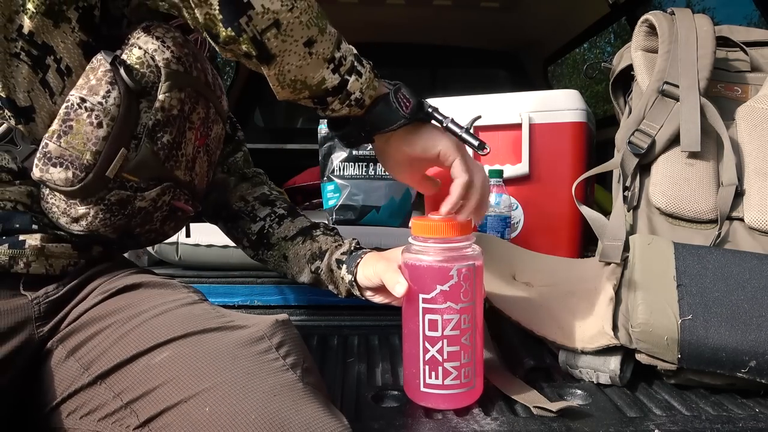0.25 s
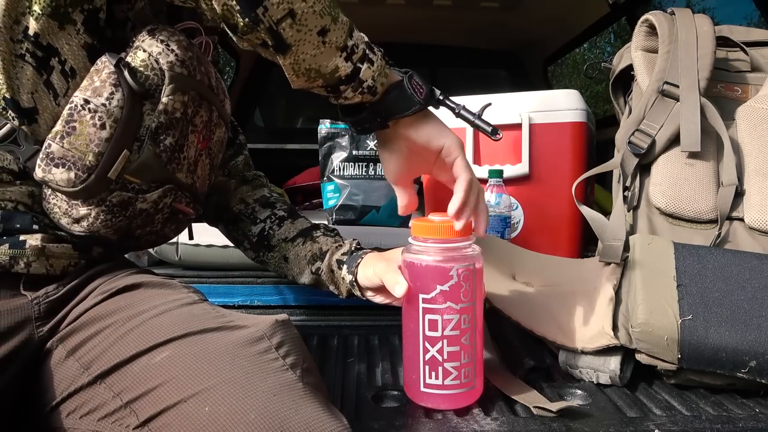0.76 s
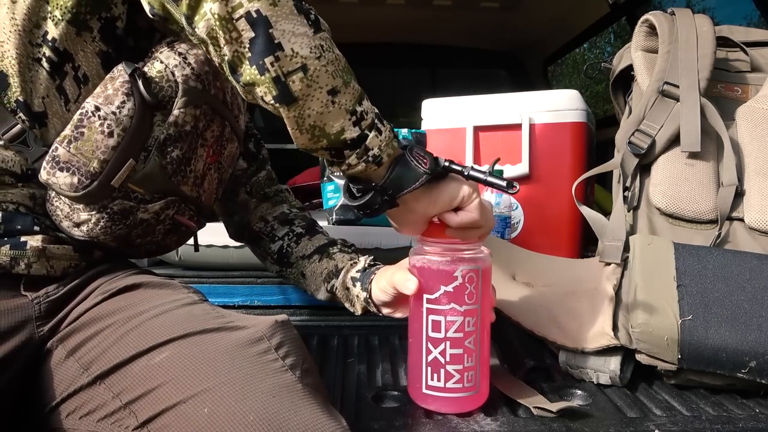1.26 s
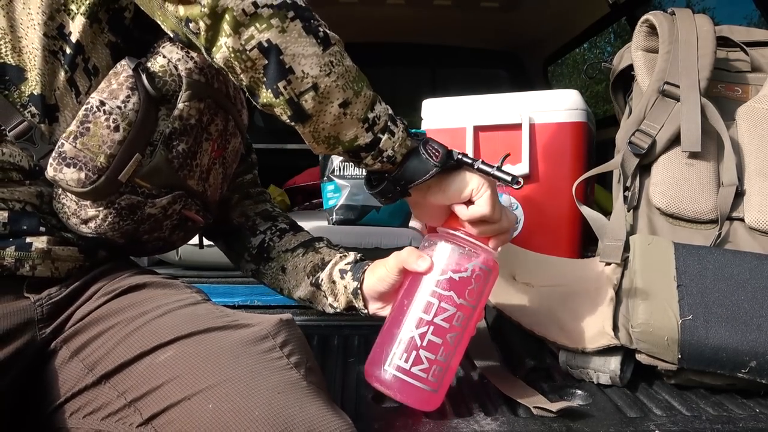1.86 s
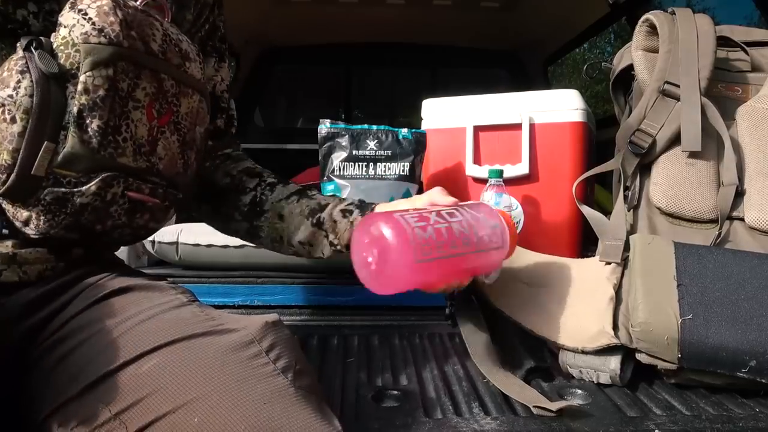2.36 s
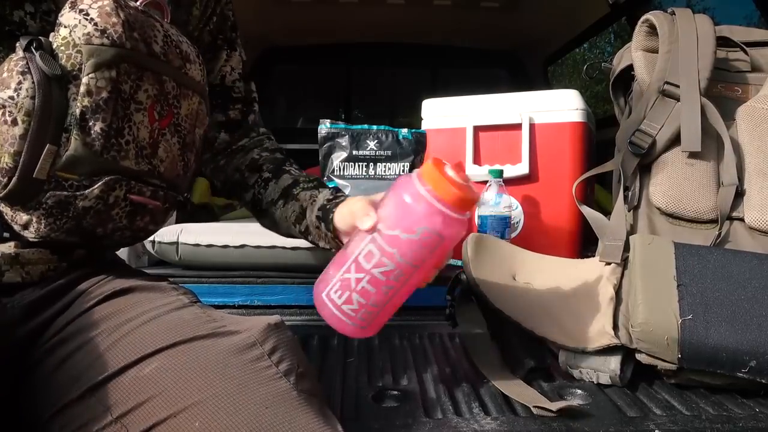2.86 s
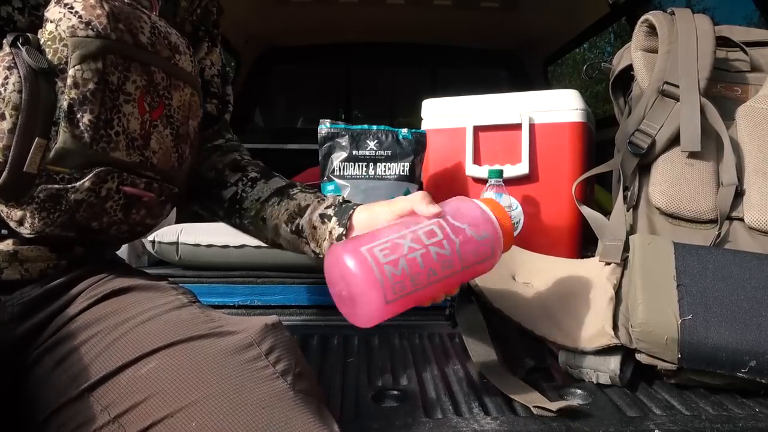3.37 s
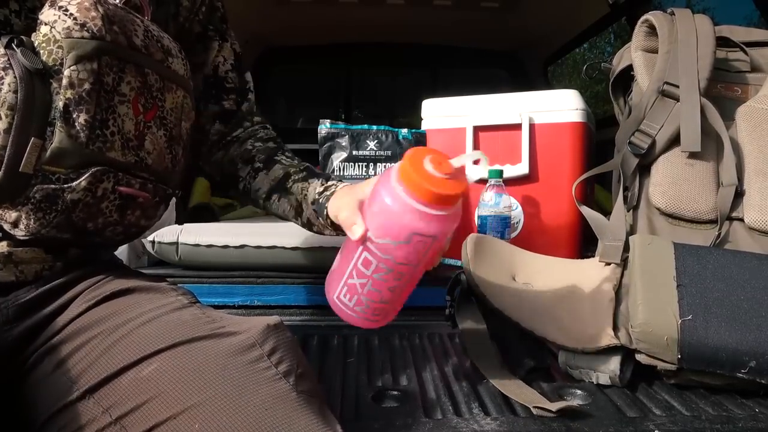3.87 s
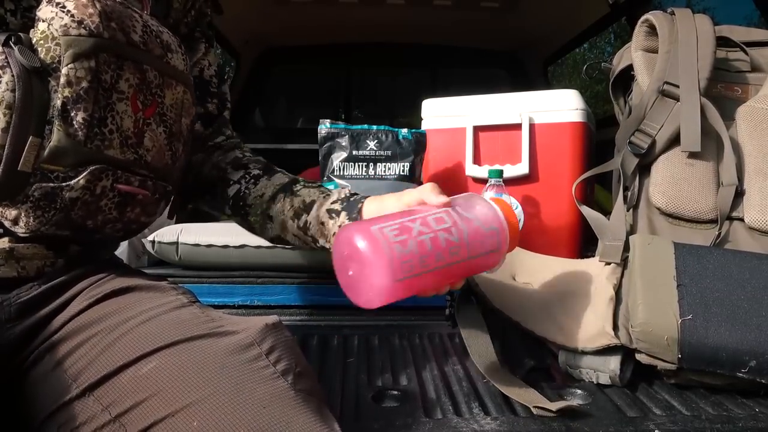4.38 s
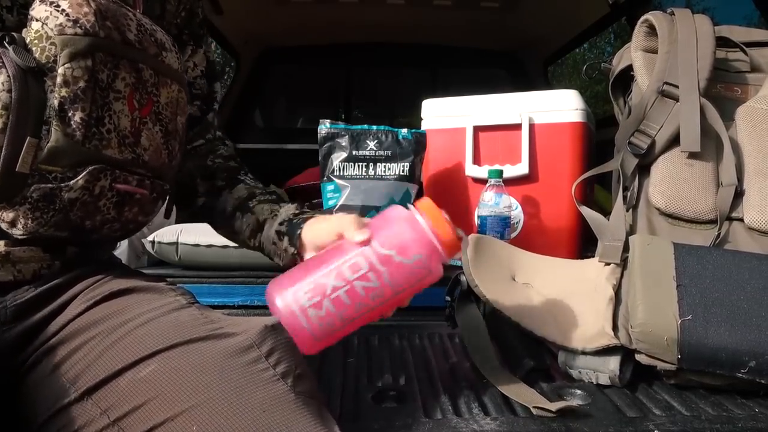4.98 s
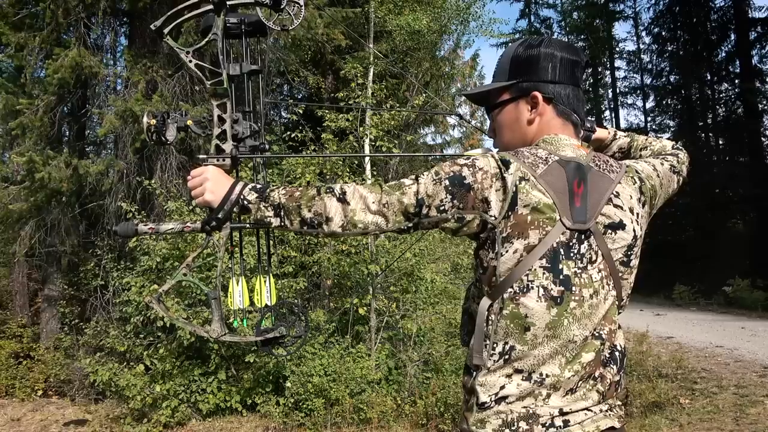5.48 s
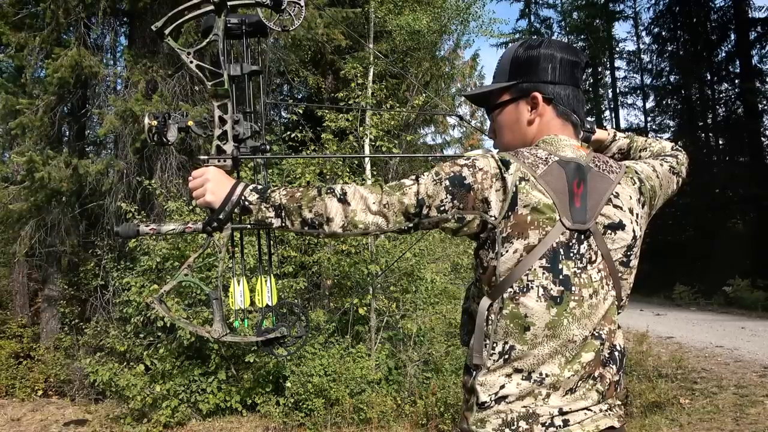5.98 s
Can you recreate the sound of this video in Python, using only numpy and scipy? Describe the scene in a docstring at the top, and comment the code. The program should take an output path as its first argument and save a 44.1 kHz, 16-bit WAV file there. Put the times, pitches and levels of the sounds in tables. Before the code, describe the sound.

Near microphone, short dull echo from the truck bed. Grainy strokes of palm and cap thread mix with crisp plastic knocks, the sharpest early on. The bottle then strikes the metal bed, by far the loudest moment, with a low boom. After a tiny pause come about three seconds of brisk, bubbly sloshing, about five splashes each second, getting softer until only the hush of woodland air remains, with a few barely audible ticks.

```python
"""Outdoors on a pickup tailgate a hand rubs and taps the cap of a wide plastic bottle: grainy noise and short rings.
The bottle bumps the truck bed, which rings as sheet metal; near the hardest bumps the truck body booms.
From about 2 s shaking makes the drink slosh: swarms of tiny rising tones through a ringing wall, plus low gulps.
By about 5.5 s it has faded into quiet woods, a filtered hush with low breeze that runs throughout.
Just after 6 s a bird whistles faintly, a wavering tone."""
import sys
import numpy as np
from scipy import signal
from scipy.fft import rfft, irfft
from scipy.io import wavfile
from scipy.ndimage import uniform_filter1d

SR = 44100
rng = np.random.default_rng(int(sys.argv[2]) if len(sys.argv) > 2 else 0)


def digitize_waveform(pressure):
    """Quantize a signal to 16-bit integers and store it at the path in sys.argv[1].

    Rows of a 2-D input are taken as channels; values are limited to [-1, 1].
    """
    field = np.atleast_2d(pressure).T
    bounded = np.clip(field, -1, 1)
    quanta = np.round(bounded * 32767).astype(np.int16)
    wavfile.write(sys.argv[1], SR, quanta)


N = 274729

# the drink slamming into an end of the bottle: t/s, level/dB, time to fall by 60 dB/s
SURGES = [(1.964, -36.5, 0.15), (2.017, -39, 0.1), (2.059, -30, 0.22), (2.09, -21.5, 0.031),
          (2.108, -16, 0.038), (2.211, -23, 0.031), (2.223, -18, .11), (2.264, -21.5, 0.099),
          (2.332, -15, 0.16), (2.4, -29, 0.2), (2.456, -21.5, .11), (2.548, -29, 0.15),
          (2.575, -9.5, 0.025), (2.662, -17.5, 0.057), (2.767, -22.5, .08), (2.785, -17.5, .062),
          (2.856, -16, 0.17), (2.974, -26, .17), (3.071, -19, 0.088), (3.183, -22.5, .11),
          (3.282, -20.5, 0.21), (3.394, -22.5, 0.2), (3.46, -25, 0.33), (3.552, -24, 0.045),
          (3.6, -21.5, 0.059), (3.672, -20, .11), (3.747, -26.5, 0.19), (3.795, -25, .13),
          (3.895, -19.5, .11), (3.972, -22, 0.063), (4.072, -18.5, 0.018), (4.173, -19, 0.018),
          (4.233, -30, 0.036), (4.267, -22.5, 0.049), (4.347, -21.5, 0.12), (4.392, -25, 0.095),
          (4.479, -20, 0.1), (4.595, -22, 0.17), (4.698, -22.5, 0.075), (4.754, -26, 0.11),
          (4.82, -26, 0.29), (4.986, -27.5, 0.18), (4.91, -29.5, 0.14), (5.101, -32, 0.11),
          (5.148, -34.5, 0.07), (5.207, -32, 0.038), (5.251, -34.5, 0.095)]


def gain_of(db):
    """Turns decibels into a gain."""
    return 10 ** (np.asarray(db) / 20)


def evened(x):
    """Scales a signal to rms 1."""
    return x / np.sqrt(np.mean(x ** 2) + 1e-20)


def smoothed_noise(size, width):
    """Makes slowly wandering random values by averaging noise over width values; rms 1."""
    return evened(uniform_filter1d(rng.standard_normal(size), width))


def twice_smoothed_noise(size, width):
    """Averages noise twice over, so that it wanders more smoothly; rms 1."""
    once = uniform_filter1d(rng.standard_normal(size), width)
    return evened(uniform_filter1d(once, width))


def read(points, hz):
    """Reads a spectrum between its points, on a log-frequency axis."""
    f, value = np.transpose(points)
    return np.interp(np.log(hz + 1), np.log(f + 1), value)


def add(mix, s, sound):
    """Mixes a sound in at s seconds."""
    part = mix[round(s * SR):][:len(sound)]
    part += sound[:len(part)]


def hiss(points, size, tilt_db=0.):
    """Noise of rms 1 with the given spectrum, tilted by tilt_db per octave above 300 Hz."""
    hz = np.fft.rfftfreq(size, 1 / SR)
    tilt = tilt_db * np.log2(np.maximum(hz, 300) / 300)
    spectrum = rfft(rng.standard_normal(size)) * gain_of(read(points, hz) + tilt)
    return evened(irfft(spectrum, size))


def ring(modes, tilt_db, stretch, seconds, spread_db, detune):
    """One blow: every mode, a close cluster of three, starts at once and dies away; peak 1."""
    t = np.arange(round(seconds * SR))[:, None] / SR
    hz, db, t60 = np.repeat(modes, 3, axis=0).T
    luck, shift = rng.standard_normal((2, len(hz)))
    start_db = db + tilt_db * np.log2(np.maximum(hz, 150) / 400) + spread_db * luck
    decay = gain_of(start_db - 60 * t / (t60 * max(stretch, .1)))
    tones = np.sin(2 * np.pi * hz * (1 + detune * shift) * t)
    x = (decay * tones).sum(1)
    return x / abs(x).max()


def air():
    """Low lumpy breeze over the steady hush of the woods, both from one shaped noise."""
    # colour of the outdoor air: f/Hz, level/dB per Hz before the overall level is set
    air_colour = [(15, -40.5), (25, -12), (38, -3.5), (58, -7), (72, -10), (87, -20.5), (167, -26.5),
                  (213, -18.5), (238, -24), (4210, -43.5), (14700, -48.5), (16400, -49.5)]
    swell = evened(gain_of(2.2 * twice_smoothed_noise(N, 4000)))
    hush = hiss(air_colour, N)
    breeze = signal.sosfiltfilt(signal.butter(2, 120, fs=SR, output="sos"), hush)
    # only the part below about 120 Hz swells
    return gain_of(-57) * (hush + breeze * (swell - 1))


def bird():
    """A thin, faint falling whistle: one tone made slightly fuzzy by a quick random waver in pitch."""
    # path of the whistle: t/s, f/Hz, level/dB
    whistle = [(6.02, 7296, -79), (6.104, 6900, -83.5), (6.23, 6800, -79.5)]
    s, hz, db = np.transpose(whistle)
    t = np.arange(s[0], s[-1], 1 / SR)
    waver_hz = 88.0 * smoothed_noise(len(t), 120)
    tone = np.sin(2 * np.pi * np.cumsum(np.interp(t, s, hz) + waver_hz) / SR)
    fade_in = np.minimum((t - s[0]) / 0.047, 1)
    return s[0], np.sqrt(2) * gain_of(np.interp(t, s, db)) * tone * fade_in


def boom():
    """The whole truck body shudders irregularly: low band-passed noise that dies away."""
    # the shudder: level/dB, time to fall by 60 dB/s, lowest f/Hz, highest f/Hz
    shudder_settings = (-25.5, 0.96, 39.5, 121)
    db, t60, low_hz, high_hz = shudder_settings
    t = np.arange(SR // 2) / SR
    band = signal.butter(2, (low_hz, high_hz), "band", fs=SR, output="sos")
    shudder = signal.sosfilt(band, rng.standard_normal(SR))[SR // 2:]  # skip the filter's start
    return evened(shudder) * gain_of(db - 60 * t / t60) * np.minimum(t / 0.044, 1)


def bed():
    """The sheet-metal bed rings under each bump; the truck body booms near the hardest ones."""
    # the bottle bumping the bed: t/s, level/dB, tilt/dB per octave, ring time as a factor
    bumps = [(0.131, -33.5, 3, 0.6), (0.206, -20.5, 4, 0.47), (0.289, -34, -4, 0.39), (0.327, -33, 7, 0.4),
             (0.444, -32, 6.5, 0.95), (0.679, -37, -1, 0.98), (0.707, -19.5, 6.5, 0.93),
             (1.248, -21.5, 2.5, 0.88), (1.463, -13, 0.5, 0.26), (1.471, -10, -4.5, 0.65),
             (1.497, -15.5, 10, 0.22), (1.589, -1, 1.5, 0.99), (1.608, 1, 2.8, 0.68),
             (1.629, -25, -13.5, 0.42), (1.651, -6.5, 3.5, 0.42)]
    # ways the metal rings: f/Hz, level/dB, time to fall by 60 dB/s, each before a bump alters it
    bed_modes = [(111.9, -10, .5), (162, -0.5, 0.37), (210.4, -14, .22), (248.4, 6, 0.25), (296.4, 3, 0.11),
                 (363.3, -12.5, 0.086), (420, -7, 0.34), (489, -6, 0.1), (633, -16.5, 0.2),
                 (785, -4.5, 0.14), (990, -11.5, 0.21)]
    bump_rise_s, stop_s = .0012, 1.945
    out = np.zeros(N)
    for s, db, tilt_db, stretch in bumps:
        blow = ring(bed_modes, tilt_db, stretch, .6, spread_db=3., detune=.035)
        onset = np.minimum(np.arange(len(blow)) / (bump_rise_s * SR), 1)
        add(out, s, gain_of(db) * blow * onset)
    add(out, 1.59, boom())
    # the ringing stops abruptly, within 4 ms
    return out * np.clip((stop_s - np.arange(N) / SR) / .004, 0, 1)


def taps():
    """Cap and fingers tap the bottle: a crack, the short ring of the cap and a brief rattle."""
    # taps: t/s, level/dB, tilt/dB per octave, ring time as a factor
    tap_list = [(0.106, -28.5, -1, 0.64), (0.129, -22, -4.5, 0.68), (0.133, -21, 1, 0.35),
                (0.2, -18.5, -1.5, 0.36), (0.287, -23, -6, 0.24), (0.441, -3.5, 0, 0.28),
                (0.487, -26.5, -6.5, 0.35), (0.678, -17, -2, 0.48), (1.245, -32, -8, 0.44),
                (1.255, -28.5, -5.5, 0.39), (1.283, -38.5, -1, 0.35), (1.589, -10, -1, 0.18),
                (1.627, -16, -5.5, 0.7), (1.704, -51, 2, 0.5), (1.753, -40, -3.5, 0.27),
                (1.787, -44, -2.5, 0.18), (1.843, -52.5, -2, 0.3), (1.882, -43, 2.5, 0.61),
                (5.608, -52.5, 0, 0.33), (5.619, -44.5, -4.5, 0.25), (5.749, -57, -4.5, 0.45),
                (6.205, -50, 1, 0.33)]
    # ways the cap rings: f/Hz, level/dB, time to fall by 60 dB/s, each before a tap alters it
    cap_modes = [(630, -10.5, 0.14), (800, -13.5, 0.31), (1257, -24, 0.09), (1547, -4, 0.26),
                 (2075, -4.5, 0.12), (2260, -1.5, 0.019), (2990, -6.5, 0.14), (4221, -2.5, 0.017),
                 (4940, -4, 0.072), (6330, -29, 0.023), (7300, -18.5, .02)]
    # loose cap buzzing after a tap, also the crack's colour: f/Hz, level/dB per Hz before tilt and scaling
    rattle_colour = [(120, -30.5), (280, -9), (700, -8.5), (1200, -3), (1600, -11), (2200, -10.5),
                     (5200, -25), (7800, -19), (10500, -33), (16000, -54)]
    # duller taps come from softer fingers and start more gently
    rise_s, softer_per_db = .00004, .5
    out, t = np.zeros(N), np.arange(4096) / SR
    for s, db, tilt_db, stretch in tap_list:
        crack = hiss(rattle_colour, len(t), tilt_db - 1.5) * gain_of(-3.5 - 60 * t / 0.014)
        rattle_t60 = max(0.12 * stretch, .01)
        rattle = hiss(rattle_colour, len(t), tilt_db) * gain_of(-7.5 - 60 * t / rattle_t60)
        cap = gain_of(2.0) * ring(cap_modes, tilt_db, stretch, len(t) / SR, spread_db=0.5, detune=0.028)
        onset = np.minimum(t / (rise_s * np.exp(-softer_per_db * tilt_db)), 1)
        add(out, s, gain_of(db) * onset * (cap + crack + rattle))
    return out


def rub(rise, hold, fall, db, tilt_db):
    """Grainy stick-slip friction noise that swells, holds and dies away."""
    # colour of the rubbing: f/Hz, level/dB per Hz before tilt and scaling
    rub_colour = [(100, -17), (166, 4.5), (300, 1.5), (760, -9), (2000, -13), (3600, -21), (5300, -22),
                  (6500, -26.5), (8200, -19.5), (10000, -35), (16000, -36.5)]
    ends_db = -26.5  # where the rise begins and the fall ends, compared with the hold
    t = np.arange(0, rise + hold + fall, 1 / SR)
    away_from_hold = np.maximum(np.maximum(1 - t / rise, (t - rise - hold) / fall), 0)
    level_db = db + ends_db * away_from_hold
    slips = evened(gain_of(2.8 * smoothed_noise(len(t), 150)))
    noise = hiss(rub_colour, len(t), tilt_db)
    # the stroke's level is that of its treble
    treble = signal.sosfilt(signal.butter(4, 3500, "high", fs=SR, output="sos"), noise)
    fade_out = np.clip(4 * (rise + hold + fall - t) / fall, 0, 1)
    return gain_of(level_db) * noise / treble.std() * slips * fade_out


def rubs():
    """Palm and cap thread rub in separate strokes, each a swell of friction noise."""
    # strokes: start t/s, rise/s, hold/s, fall/s, treble level/dB, tilt/dB per octave
    strokes = [(0.017, 0.037, 0.045, .06, -53.5, 2.4), (.09, 0.051, 0.059, 0.044, -44.5, 2.7),
               (0.24, 0.022, .002, .025, -55, 0), (0.302, 0.02, 0.011, 0.028, -51, -1),
               (0.149, 0.07, 0.18, 0.065, -67.5, -0.5), (0.446, 0.005, 0.0022, 0.099, -37.5, 0.5),
               (0.497, 0.048, 0.027, 0.17, -70.5, -1.5), (0.675, 0.0042, 0.023, 0.13, -44.5, 0.15),
               (.8, 0.31, 0.025, 0.13, -57, 1), (1.102, 0.14, .19, 0.11, -60, 1.5),
               (1.431, 0.031, 0.056, 0.061, -49, -1.5), (1.521, 0.064, 0.066, .08, -54, -3.5)]
    out = np.zeros(N)
    for start, *stroke in strokes:
        add(out, start, rub(*stroke))
    return out


def bubble(db, hz, t60, slide, attack):
    """An air pocket rings as a damped, wobbling tone that slides a little in pitch."""
    t = np.arange(6000) / SR
    wobble = 0.044 * smoothed_noise(len(t), 300)
    drift = slide * (rng.standard_normal() + .5) * t  # more often up than down
    turns = np.cumsum(hz * (1 + drift + wobble)) / SR
    envelope = gain_of(db - 60 * t / max(t60, .01)) * np.minimum(t / attack, 1)
    return envelope * np.sin(2 * np.pi * turns)


def gulps():
    """Large trapped air pockets gulp low; every surge also throws off one small bright bubble."""
    # pockets gulping: t/s, level/dB, basic f/Hz
    pockets = [(2.113, -24, 245.7), (2.221, -28.5, 272), (2.559, -22.5, 341), (2.579, -22.5, 485),
               (2.725, -24.5, 640), (2.819, -20.5, 750), (2.954, -25, 237), (3.073, -16.5, 612),
               (3.291, -24, 584), (3.447, -23, 618), (3.55, -24, 517), (3.598, -22.5, 272),
               (3.679, -24, 523), (3.801, -24.5, 246), (3.972, -27.5, 557), (4.051, -23, 444),
               (4.177, -25.5, 270), (4.396, -21.5, 535), (4.819, -25.5, 286), (5.148, -29, 550)]
    gulp_cycles = 24  # cycles to fall by 60 dB, so big low pockets ring longest
    surge_hz, surge_spread = 1526, 0.0756  # typical pitch of a surge's bubble, and its scatter as a share
    out = np.zeros(N)
    for s, db, hz in pockets:
        add(out, s, bubble(db, hz, gulp_cycles / hz, slide=1.3, attack=0.0024))
    for s, db, _ in SURGES:
        hz = surge_hz * np.exp(surge_spread * rng.standard_normal())
        add(out, s + 0.001955, bubble(db - 5.5, hz, 0.048, slide=4.9, attack=0.0022))
    return out


def effort(rise=0.0059):
    """Level in dB over time of the water's body, thud and spray: churning plus shakes and surges."""
    # churning between the surges: t/s, level/dB before lulls, thud share/dB
    churn = [(1.96, -59, -6), (2.27, -41, -35), (2.53, -40, -22), (2.569, -39.5, -8), (2.74, -37.5, -14),
             (2.78, -37, -10), (4.71, -40.5, -7), (5.05, -46.5, -7.5), (5.31, -46.5, -2),
             (5.53, -62, -10.5)]
    # each shake of the hand throws fine spray on the wall: start t/s, length/s, spray level/dB
    shakes = [(1.94, 0.096, -59), (2.101, 0.016, -48), (2.203, 0.07, -43.5), (2.337, 0.15, -42.5),
              (2.545, 0.16, -48), (2.755, .18, -48.5), (2.97, .15, -48.5), (3.168, 0.15, -47),
              (3.404, .16, -49), (3.588, 0.17, -49.5), (3.786, 0.17, -48.5), (3.988, 0.11, -47.5),
              (4.162, .19, -51), (4.396, .15, -52.5), (4.611, 0.12, -55), (4.755, 0.14, -59.5),
              (4.89, 0.071, -55), (5.035, 0.11, -58), (5.21, 0.031, -65), (5.301, 0.016, -63),
              (5.345, 0.048, -65), (5.407, 0.06, -70.5)]
    spray_rise_s, spray_fall_db_per_s = 0.0074, 400
    spray_rest_db = -21  # spray between shakes, compared with the churning
    lull_share = 0.27  # how far the churning's body follows the spray down between shakes
    s, body, thud = np.transpose(churn)
    t = np.arange(s[0], s[-1], 1 / SR)
    body_db = np.interp(t, s, body)
    spray_db, lull_db = body_db + spray_rest_db, np.full(len(t), -15.)
    for at, length, db in shakes:
        rising_db = 20 * np.log10(np.clip((t - at) / spray_rise_s, 1e-4, 1))
        shape_db = rising_db - spray_fall_db_per_s * np.maximum(t - at - length, 0)
        spray_db = np.maximum(spray_db, db + shape_db)
        lull_db = np.maximum(lull_db, shape_db)
    spatter_db = 2.9 * twice_smoothed_noise(len(t), 300)  # spray lands in clumps
    levels_db = [body_db + lull_share * lull_db, np.interp(t, s, body + thud), spray_db + spatter_db]
    power = gain_of(2 * np.array(levels_db))  # doubled decibels give power instead of gain
    u = np.arange(10000) / SR
    for at, db, t60 in SURGES:
        fading = gain_of(-120 * np.maximum(u - rise, 0) / max(t60, .01))
        shape = np.minimum(u / rise, 1) ** 2 * fading
        for row, share_db in zip(power, (-7., -20., -30.)):
            add(row, at - .003 - s[0], shape * gain_of(2 * (db + share_db)))
    return s[0], 10 * np.log10(power)


def slosh(cycles=2.5, per_s=180., size_db=4.5, wash=0.47):
    """Countless short splashes and bubbles of every size, heard through the ringing bottle wall."""
    # colour of the water: f/Hz, level/dB per Hz before effort and wall
    water_colour = [(71, -49), (120, -16.5), (267, -1.5), (378, -5), (617, -7), (1070, -5.5), (1550, -1.5),
                    (1860, -7.5), (3240, -9.5), (6500, -21), (8310, -15), (9990, -47), (13000, -18.5),
                    (16000, -91)]
    # wall and air resonances: f/Hz, width/Hz, level/dB
    bottle_modes = [(563, 340, -1), (1485, 71, -5), (8440, 220, 1.5)]
    start, efforts_db = effort()
    size = efforts_db.shape[1]
    out, pitches = np.zeros(size), np.geomspace(130, 15500, 34)
    weight = gain_of(read(water_colour, pitches)) * np.sqrt(pitches)
    # take out each band's own strength, so that the efforts set its level
    levels = []
    for effort_db, (low_hz, high_hz) in zip(efforts_db, ((700, 3000), (150, 450), (6000, 12000))):
        inside = (low_hz < pitches) & (pitches < high_hz)
        levels.append(effort_db - 10 * np.log10((weight[inside] ** 2).sum()))
    body, thud, spray = levels
    for hz, w in zip(pitches, weight):
        # low pitches follow the thud, high ones the spray, the rest the body
        low, high = np.clip(np.log2(700 / hz), 0, 1), np.clip(np.log2(hz / 3000), 0, 1)
        level_db = (1 - low - high) * body + low * thud + high * spray
        lumps = smoothed_noise(size // 256 + 2, 5)  # each bubble size comes in swarms
        level_db = level_db + 2.09 * np.interp(np.arange(size) / 256, np.arange(len(lumps)), lumps)
        # single drops of random size and sign over a steady wash
        chance, drop_size = rng.random(size), rng.exponential(1, size)
        noise = rng.standard_normal(size)
        hit = chance < per_s * (hz / 1000) ** .8 / SR
        drops = evened(hit * gain_of(size_db * np.minimum(drop_size, 4)) * np.sign(noise))
        drive = (wash * noise + np.sqrt(1 - min(wash, 1) ** 2) * drops) * w * gain_of(level_db)
        turn = np.arange(round(4 * cycles * SR / hz)) * hz / SR
        tone = np.sin(2 * np.pi * turn * (1 + 0.0041 * turn))  # a bubble rises in pitch
        grain = turn * np.exp(-2 * turn / cycles) * tone
        out += signal.oaconvolve(drive, grain / np.linalg.norm(grain))[:size]
    wall = out.copy()
    for hz, width, db in bottle_modes:
        wall += gain_of(db) * signal.lfilter(*signal.iirpeak(hz, hz / width, SR), out)
    return start, gain_of(-2.0) * wall * signal.windows.tukey(size, .01)  # soft start and end


def echo(near):
    """A short dull echo from the truck bed walls: the sound spread out by smoothed, dying noise."""
    t = np.arange(6000) / SR
    walls = uniform_filter1d(rng.standard_normal(len(t)), size=8) * gain_of(-60 * t / 0.17)
    walls *= t > .003  # nothing comes back in the first 3 ms
    return gain_of(-19.5) * signal.oaconvolve(near, walls / np.linalg.norm(walls))[:N]


def scene():
    """Mixes all sources; only the near ones get the echo, the bird and the air do not."""
    near = bed() + taps() + rubs() + gulps()
    add(near, *slosh())
    mix = near + echo(near)
    add(mix, *bird())
    return (mix + air())[None]


def record(dry):
    """The input stage rounds off the hardest knocks; then a low-pass removes the highest treble."""
    edge_hz = 15950
    rounded = .85 * np.tanh(dry / .85)
    low_pass = signal.firwin(511, edge_hz, window=("kaiser", 9), fs=SR)
    return signal.oaconvolve(rounded, low_pass[None], "same")


dry = scene()
out = record(dry)
digitize_waveform(out)
```